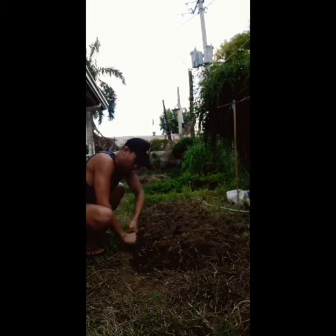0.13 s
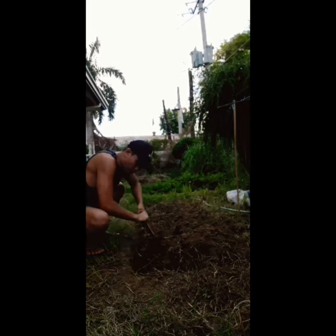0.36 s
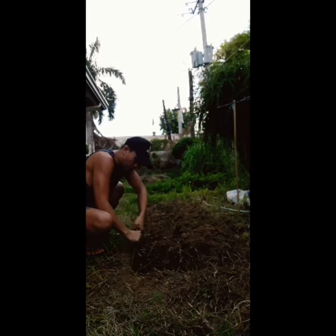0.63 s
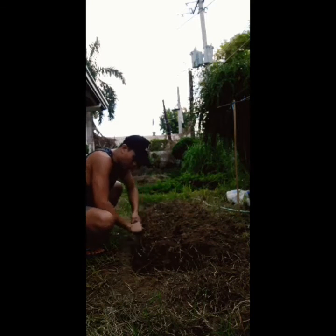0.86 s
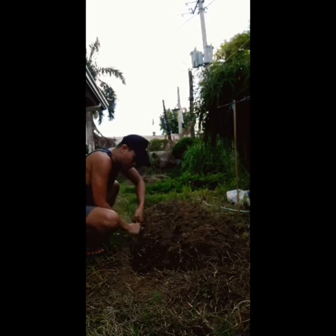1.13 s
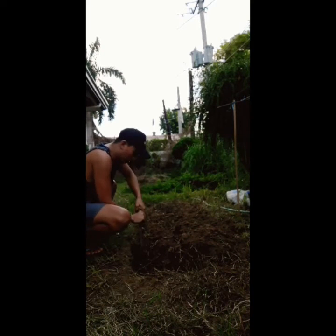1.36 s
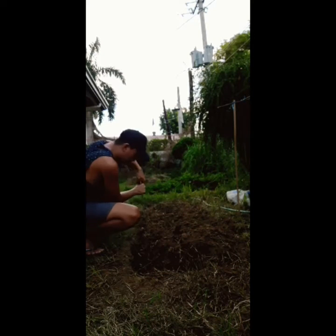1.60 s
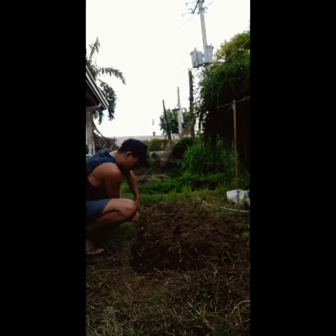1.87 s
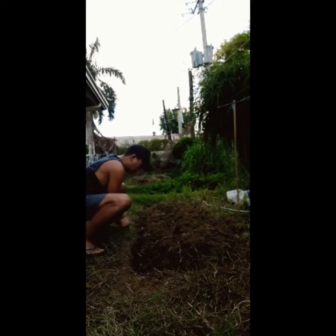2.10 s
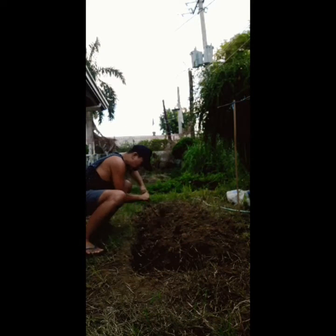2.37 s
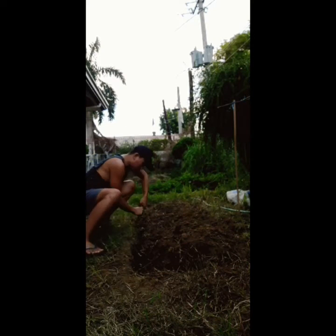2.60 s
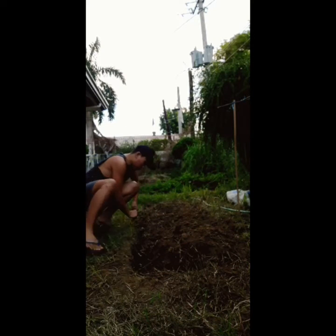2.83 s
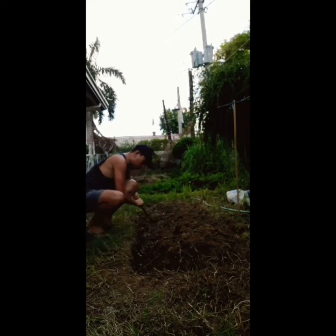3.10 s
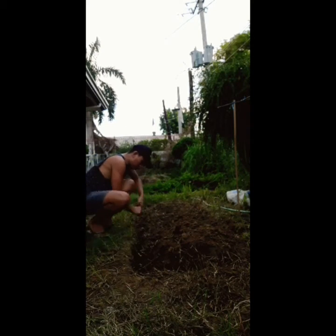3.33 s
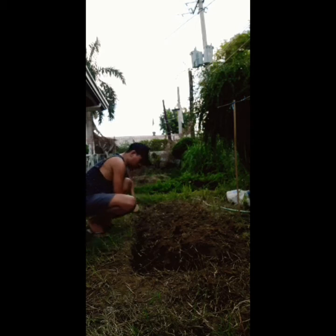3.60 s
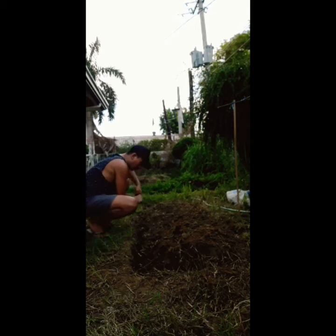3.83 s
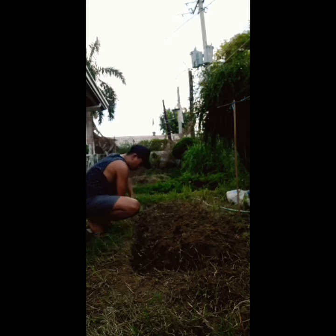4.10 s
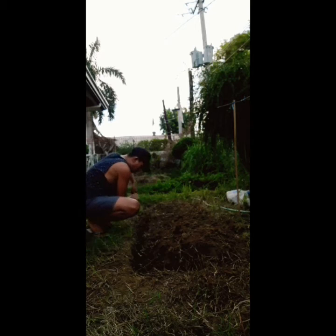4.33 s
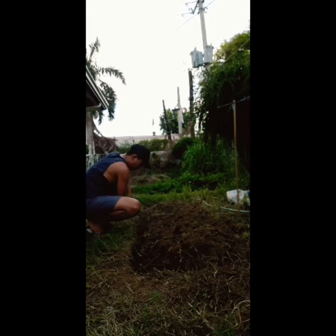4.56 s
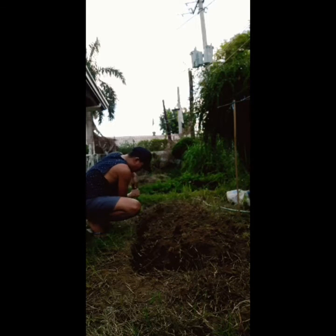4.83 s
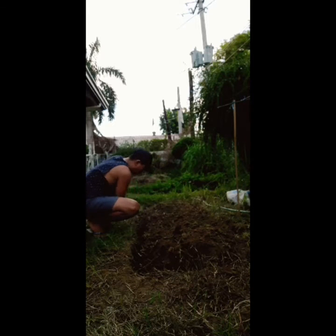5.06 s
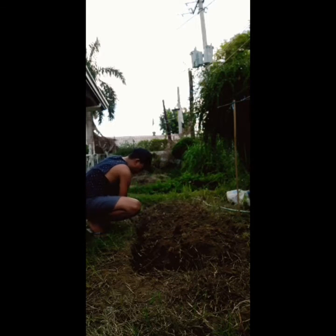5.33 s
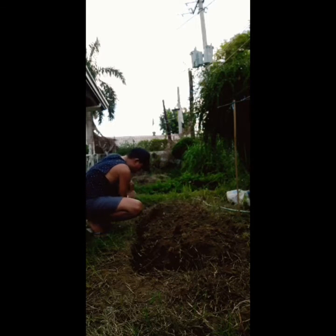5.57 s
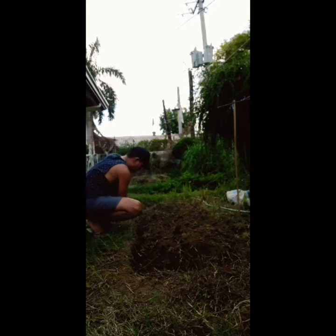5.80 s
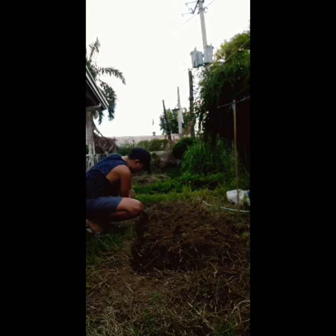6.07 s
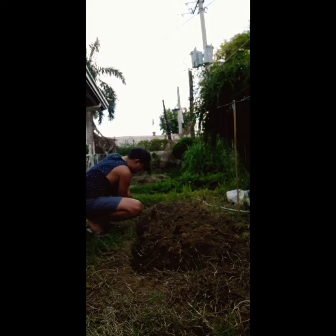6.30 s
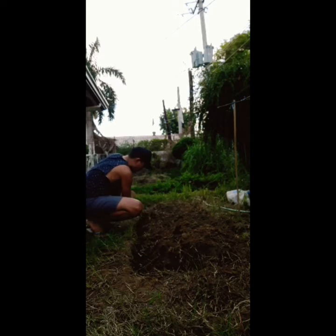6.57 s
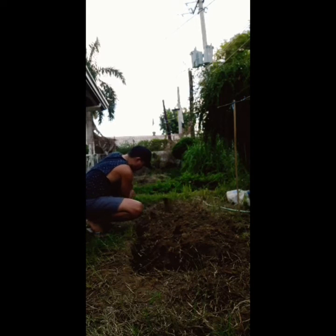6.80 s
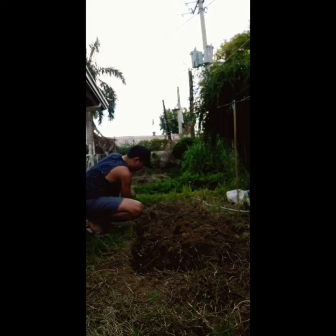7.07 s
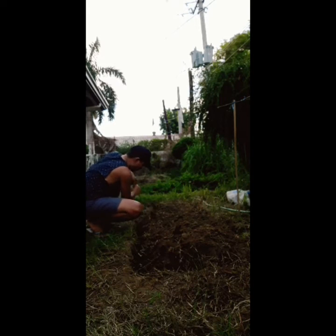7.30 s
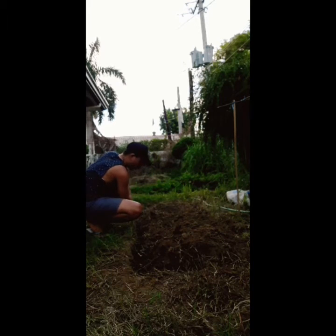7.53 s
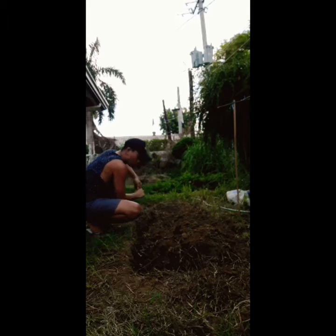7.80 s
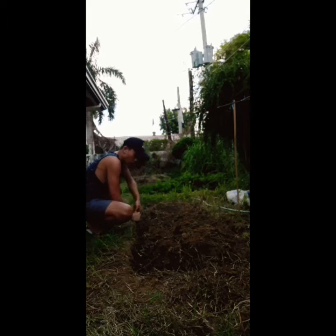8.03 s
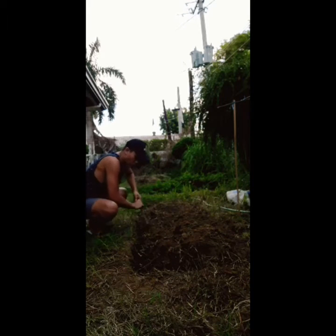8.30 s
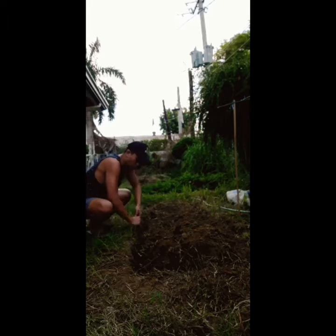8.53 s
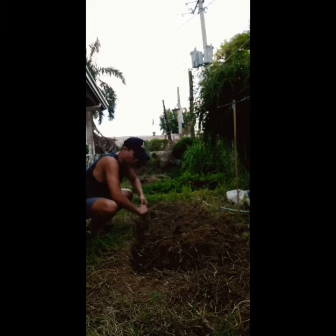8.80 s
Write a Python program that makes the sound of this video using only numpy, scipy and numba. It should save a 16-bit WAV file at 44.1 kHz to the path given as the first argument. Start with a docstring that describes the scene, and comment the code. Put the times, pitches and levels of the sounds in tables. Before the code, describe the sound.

A short hand tool bites, scrapes and clinks through loose gritty garden soil while crickets chirr, small birds cheep and a far rooster crows.

```python
"""First a short hand tool is heard already grinding in loose garden soil, a few metres from a phone on the ground.
Noise grains make the grit, a moving resonance the scrape, short rings the pebbles, decaying tones the thuds.
Around it two crickets chirr (clicks through a narrow band) and small birds cheep (gliding tones).
A far rooster crows in hoarse harmonics, thin held notes call, and late on a motor hums up in wavering orders
over the rumble and hiss of the neighbourhood, which are coloured noise."""
import sys
import numpy as np
from scipy import signal
from scipy.fft import rfft, irfft
from scipy.io import wavfile
from scipy.ndimage import uniform_filter1d
from numba import njit

SR = 44100
rng = np.random.default_rng(int(sys.argv[2]) if len(sys.argv) > 2 else 0)


def makeup_ratio(level_db):
    """Linear amplitude ratio for a level in decibels (20 dB per factor of ten)."""
    decades = np.asarray(level_db, float) / 20
    return 10 ** decades


def unload_wav(signal):
    """Save mono or channel-first audio to the path in sys.argv[1] as 16-bit WAV at rate SR, clipped to [-1, 1]."""
    wavfile.write(
        sys.argv[1],
        SR,
        np.round(np.clip(np.atleast_2d(signal).T, -1, 1) * 32767).astype(np.int16),
    )


N = 392931
T = np.arange(N) / SR
HZ = np.fft.rfftfreq(N, 1 / SR)


def unit(x):
    """Scale to rms 1."""
    return x / np.sqrt(np.mean(x ** 2))


def curve(table):
    """Gain at every frequency from (f/Hz, level/dB) points."""
    f, db = np.transpose(table)
    return makeup_ratio(np.interp(np.log(HZ + 1), np.log(f), db))


def colour(x, spectrum, lo_hz, hi_hz):
    """The part lo-hi of a spectrum, scaled so that white noise keeps its rms."""
    edges = np.sqrt((1 + (lo_hz / (HZ + 1)) ** 14) * (1 + (HZ / hi_hz) ** 14))
    return irfft(rfft(x) * unit(curve(spectrum) / edges), N)


def resonate(x, hz, width):
    """Two-pole resonance, gain 1 at the centre."""
    return signal.lfilter(*signal.iirpeak(hz, hz / width, SR), x)


def walk(rate):
    """Random levels, a new one each 1 / rate s, joined by straight slopes; rms 1."""
    k = int(SR / rate)
    return unit(uniform_filter1d(np.repeat(rng.standard_normal(N // k + 1), k), k)[:N])


def swell(start, length, rise, fall):
    """Envelope that rises, holds until its length is over and dies away exponentially (all in s)."""
    t = T - start
    return np.clip(t / rise, 0, 1) * np.exp(-np.maximum(t - length, 0) / fall)


def yard(x, t60, wet_db):
    """Scattered echoes from walls and bushes: a decaying noise tail from 4 ms on."""
    t = T[:SR // 2]
    tail = rng.standard_normal(len(t)) * np.exp(-np.log(1000) * t / t60) * (t > .004)
    echoes = signal.fftconvolve(x, tail / np.sqrt(np.sum(tail ** 2)))[:N]
    return x + makeup_ratio(wet_db) * echoes


def grains(rate, spread_db, length, hiss):
    """Envelope of short bursts of uneven size over the steady hiss of finer sand."""
    ticks = (rng.random(N) < rate / SR) * makeup_ratio(spread_db * np.clip(rng.standard_normal(N), -2, 2))
    bursts = signal.lfilter([1], [1, -np.exp(-1 / (length * SR))], ticks)
    return unit(bursts) + hiss


# faint hiss of opposite sign in the two channels: f/Hz, relative level/dB
CHANNEL_HISS = [(100, -5), (1000, -9), (14000, -7.5)]


def self_noise():
    """Steady microphone noise, the part that differs between the channels."""
    return makeup_ratio(-79.0) * colour(rng.standard_normal(N), CHANNEL_HISS, 40, 16500)


# colour of the open air at the microphone: f/Hz, relative level/dB
AIR_COLOUR = [(30, -21), (60, -4), (100, 2.5), (200, 0), (330, -8), (450, -15), (600, -17), (950, -25),
              (1500, -20.5), (2000, -23), (2600, -23.5), (3100, -26), (4300, -37), (7500, -22),
              (10000, -37.5), (15800, -37)]
# far mid hiss of the neighbourhood: t/s, level/dB
TOWN_HISS = [(0, -69.5), (1.2, -72.5), (1.8, -68), (2.6, -72), (3.1, -70), (3.9, -71), (4.7, -64),
             (5.7, -63.5), (6.4, -61), (7.3, -67), (8.3, -69.5), (8.91, -69)]


def town():
    """Far traffic rumbles, a mid hiss swells, the treble air stays smooth."""
    rumble_db = -59.5 + 0.88 * walk(4.5) + 1.58 * walk(12)
    rumble = colour(rng.standard_normal(N), AIR_COLOUR, 29, 676) * makeup_ratio(rumble_db)
    hiss_db = np.interp(T, *np.transpose(TOWN_HISS)) + 0.21 * walk(3.2)
    hiss = colour(rng.standard_normal(N), AIR_COLOUR, 830, 2560) * makeup_ratio(hiss_db)
    treble = makeup_ratio(-71.5) * colour(rng.standard_normal(N), AIR_COLOUR, 3450, 19000)
    return rumble + hiss + treble


# motor in the distance, before the level of each order: t/s, level/dB
MOTOR_SWELL = [(6.9, -99), (7.4, -83), (7.8, -71.5), (8.1, -71.5), (8.3, -76), (8.6, -69.5), (8.91, -70)]
# its orders: multiple of the base frequency, relative level/dB
ORDERS = [(2, 2), (3, 10), (4, 10.5), (5, -1.5), (6, -6)]


def motor():
    """Engine orders share one wavering speed, each with its own flicker; the hum comes up late."""
    base_hz = 62.8
    phase = 2 * np.pi * np.cumsum(base_hz * (1 + 0.0048 * walk(5.5))) / SR
    tone = sum(makeup_ratio(db + 4 * walk(7)) * np.sin(k * phase) for k, db in ORDERS)
    return tone * makeup_ratio(np.interp(T, *np.transpose(MOTOR_SWELL)))


# faint steady call far off: t/s, length/s, f/Hz, level/dB
FAR_NOTES = [(5.456, 0.3, 547, -73.5), (6.31, 0.23, 1315, -65), (6.497, 0.23, 1310, -71),
             (6.89, 0.13, 1210, -66)]


def far_call():
    """A few thin held notes: sines with a slight waver in pitch and level."""
    waver = np.cumsum(1 + 0.0038 * walk(20)) / SR
    out = 0
    for s, length, hz, db in FAR_NOTES:
        level = makeup_ratio(db + 3.0 * walk(25)) * swell(s, length, 0.03, 0.037)
        out = out + level * np.sin(2 * np.pi * hz * waver)
    return out


# far rooster, one list per note: t/s, fundamental f/Hz, second harmonic level/dB, fundamental re second/dB
CROW_NOTES = [
    [(4.14, 948, -64, -25), (4.24, 971, -60, -3), (4.32, 926, -60, -10.5), (4.44, 939, -66.5, -4),
     (4.7, 949, -72, -5)],
    [(4.46, 1047, -61, -9), (4.6, 1045, -60.5, -3.5), (4.68, 1041, -54.5, -8), (4.92, 1037, -59.5, -6),
     (4.99, 987, -71, -15)],
    [(4.8, 954, -65.5, 0), (5.1, 924, -65, -13.5), (5.3, 953, -57, -7), (5.47, 950, -66, -8),
     (5.62, 975, -71, -13)],
]
# fourth harmonic of each note: level re second/dB
CROW_FOURTH = [-18, -26, -22.5]


def rooster():
    """Harmonic notes made hoarse by fast random pitch and level."""
    out = 0
    for note, fourth_db in zip(CROW_NOTES, CROW_FOURTH):
        s, hz, db, first_db = np.transpose(note)
        hz = np.interp(T, s, hz) * (1 + .006 * walk(25) + .021 * walk(250))
        phase = 2 * np.pi * np.cumsum(hz) / SR
        hoarse_db = 2.2 * walk(30) + 2.5 * walk(150)
        first = makeup_ratio(np.interp(T, s, first_db)) * np.sin(phase)
        tone = first + np.sin(2 * phase) + makeup_ratio(fourth_db) * np.sin(4 * phase)
        level = makeup_ratio(np.interp(T, s, db) + hoarse_db)
        out = out + tone * level * swell(s[0] - .03, s[-1] - s[0], 0.027, 0.026)
    return out


# small birds about the yard: t/s, start f/Hz, end f/Hz, length/s, level/dB
BIRD_CHEEPS = [(0.074, 2500, 2700, 0.17, -65.5), (0.101, 2900, 3000, 0.12, -63),
               (0.153, 3110, 4070, 0.12, -59.5), (0.798, 4650, 4600, 0.013, -45.5),
               (0.934, 3025, 3090, 0.12, -65.5), (3.964, 7200, 6500, 0.032, -53.5),
               (4.745, 7000, 6360, 0.029, -50.5), (4.782, 2640, 2890, 0.093, -63),
               (6.43, 4080, 4160, 0.036, -60), (7.852, 6900, 6520, 0.044, -47.5),
               (7.89, 2620, 2910, 0.056, -63), (7.926, 4300, 4300, 0.081, -59),
               (7.951, 4900, 4700, 0.038, -55), (8.194, 1980, 2030, 0.033, -58),
               (8.373, 7050, 6360, 0.03, -46.5), (8.467, 6480, 6000, 0.032, -47)]


def birds():
    """Short gliding whistles, ragged in pitch and trilling in level."""
    waver = 1 + .012 * walk(60) + .03 * walk(600)
    trill = makeup_ratio(2.5 * walk(90))
    out = 0
    for s, hz0, hz1, length, db in BIRD_CHEEPS:
        hz = np.interp(T, [s, s + length], [hz0, hz1]) * waver
        whistle = np.sin(2 * np.pi * np.cumsum(hz) / SR)
        out = out + makeup_ratio(db) * swell(s, length, 0.062 * length, 0.0032) * whistle
    return out * trill


def cricket(chirps, hz, width, stroke_hz):
    """Wing strokes in groups of four ring the wing; each chirp swells and stops."""
    strokes = np.floor(np.cumsum(stroke_hz * (1 + 0.047 * walk(30))) / SR)
    stroke_db = 2.5 * rng.standard_normal(N) + 3.5 * np.cos(strokes * np.pi / 2)
    clicks = np.diff(strokes, prepend=0) * makeup_ratio(stroke_db)
    rasp = signal.lfilter([1], [1, -np.exp(-1 / (0.008 * SR))], clicks) * rng.standard_normal(N)
    wing = signal.butter(2, [hz - width / 2, hz + width / 2], "band", fs=SR, output="sos")
    song = unit(signal.sosfilt(wing, unit(clicks) + 1.8 * unit(rasp)))
    return song * sum(makeup_ratio(db) * swell(s, length, 0.032, 0.0029) for s, length, db in chirps)


# chirps of the lower cricket: t/s, level/dB
LOW_CHIRPS = [(-.03, -57), (0.331, -54), (.6, -60), (.87, -59), (1.15, -60), (1.48, -60.5), (1.745, -59.5),
              (2.05, -60), (2.32, -60.5), (2.58, -59.5), (2.83, -59.5), (3.085, -60.5), (3.385, -56.5),
              (3.65, -58), (3.92, -59), (4.2, -59.5), (4.475, -57.5), (4.805, -56.5), (5.369, -59),
              (5.61, -56.5), (5.89, -62), (6.16, -64.5), (6.47, -58.5), (6.759, -60.5), (7.04, -61.5),
              (7.33, -58.5), (7.66, -68), (7.9, -59.5), (8.2, -55.5), (8.49, -64), (8.72, -58.5)]
# chirps of the higher cricket: t/s, length/s, level/dB
HIGH_CHIRPS = [(.05, 0.15, -58), (.43, 0.17, -62), (.68, 0.12, -54), (4.18, 0.11, -55), (4.6, 0.073, -58),
               (5.0, 0.32, -57), (5.41, 0.11, -57), (5.72, 0.097, -55), (6.115, 0.15, -53.5),
               (6.47, 0.16, -55), (6.98, 0.16, -54.5), (7.35, 0.079, -59), (7.675, 0.21, -61),
               (8.06, 0.18, -58), (8.4, 0.16, -55), (8.78, 0.055, -57.5)]


def crickets():
    """Two insects with their own wing resonance and stroke rate; the lower one's chirps are equally long."""
    low = cricket([(s, .16, db) for s, db in LOW_CHIRPS], hz=5730, width=284, stroke_hz=162)
    return low + cricket(HIGH_CHIRPS, hz=5983, width=350, stroke_hz=160)


def wavering_tone(hz):
    """Sine whose pitch wanders, as in uneven ground."""
    return np.sin(2 * np.pi * np.cumsum(hz * (1 + .1 * walk(90))) / SR)


# the blade stops in the ground: t/s, hollow peak level/dB, deep thump peak level/dB, handle and clods level/dB
BLADE_STOPS = [(0.287, -41.5, -55, -52), (0.308, -49, -58, -54), (0.335, -34, -47, -41.5),
               (0.796, -67, -60, -50), (0.825, -47, -46, -51.5), (1.266, -60, -47, -62.5),
               (1.301, -50, -50, -55.5), (1.349, -37.5, -46, -56.5), (2.02, -54, -57, -51.5),
               (2.04, -43.5, -52, -67), (2.053, -66, -43, -74), (2.768, -62, -49, -57),
               (3.265, -50.5, -53.5, -63.5), (3.534, -47.5, -63, -56.5), (4.119, -64, -51, -55),
               (5.143, -41.5, -55, -53.5), (6.498, -51.5, -58, -56), (7.095, -34.5, -40, -51.5),
               (7.68, -54.5, -70, -71), (8.756, -47.5, -46.5, -60)]
# tones of the wooden handle: f/Hz, relative level/dB
HANDLE_TONES = [(800, -3), (1000, -5), (1550, 0)]


def blows(column, rise, t60):
    """Envelope of all the blade stops, at the levels of one column."""
    fall = t60 / np.log(1000)
    return sum(makeup_ratio(row[column]) * swell(row[0], rise, rise, fall) for row in BLADE_STOPS)


def thuds():
    """A soft push rings the dug hole and the ground under it; the handle knocks and clods break."""
    hole = wavering_tone(435) * blows(column=1, rise=0.0038, t60=0.049)
    ground = wavering_tone(200) * blows(column=2, rise=0.0027, t60=0.13)
    handle = sum(makeup_ratio(db) * wavering_tone(hz) for hz, db in HANDLE_TONES)
    handle = handle * blows(column=3, rise=0.001, t60=.09)
    crumble = unit(grains(200, 4., .004, .6) * rng.standard_normal(N))
    clods = colour(blows(column=3, rise=0.0071, t60=0.19) * crumble, SOIL_COLOUR, 504, 1720)
    return hole + ground + handle + clods


# pebbles on the blade: t/s, peak level/dB, ring f/Hz
PEBBLE_TICKS = [(0.038, -43, 7240), (0.267, -27.5, 8000), (0.291, -22.5, 6340), (0.3117, -20.5, 6750),
                (0.318, -30, 7500), (0.342, -26, 5820), (0.348, -31, 7420), (0.363, -32, 7500),
                (0.501, -41.5, 7400), (0.745, -52, 7050), (0.7622, -31, 7200), (0.8005, -26, 7240),
                (0.809, -37, 7300), (0.8278, -23.5, 7000), (0.837, -37, 6730), (1.267, -52, 5900),
                (1.288, -39, 7150), (1.515, -26.5, 5800), (1.52, -27.5, 6080), (1.549, -40, 5400),
                (2.0105, -31, 7380), (2.037, -31, 6300), (2.1904, -45, 6200), (2.751, -42, 7350),
                (2.794, -35, 7500), (3.005, -32, 8100), (3.246, -42, 1870), (3.265, -39.5, 1690),
                (3.511, -30, 7370), (3.538, -36, 6750), (3.552, -38, 6180), (4.087, -41, 7050),
                (4.1122, -29, 6740), (4.598, -35, 6900), (4.9005, -50, 7940), (4.94, -53, 7500),
                (5.1243, -28, 7060), (5.146, -29, 6070), (5.832, -41, 7600), (6.472, -42, 2000),
                (7.1015, -34, 8900), (7.61, -49, 7440), (7.668, -41, 7400), (8.21, -43, 5960),
                (8.373, -40, 6600), (8.395, -46, 7040), (8.4146, -38, 7200), (8.7375, -36, 7070)]


def pebbles():
    """Each tick is a rattle of a few milliseconds that rings the blade briefly."""
    size = 900  # samples
    out, t = np.zeros(N + size), T[:size]
    bursts = rng.standard_normal((len(PEBBLE_TICKS), size))
    for (s, db, hz), burst in zip(PEBBLE_TICKS, bursts):
        envelope = np.minimum(t / .0004, 1) * np.exp(-t / .0017)
        crack = (1 + 1.2 * burst) * envelope * np.sin(2 * np.pi * hz * t)
        tick = resonate(resonate(crack, hz, .8 * hz), hz, .8 * hz) + .2 * crack
        i = int(s * SR)
        out[i:i + size] += makeup_ratio(db) * tick / np.max(abs(tick))
    return out[:N]


def stroke(start, push, t60, entry_db):
    """Jumps in at contact, grows in dB while the blade is pushed, then dies away."""
    contact_s = 0.0015
    t = T - start
    grow_db = entry_db * np.clip(1 - t / push, 0, 1)
    return np.clip(t / contact_s, 0, 1) * makeup_ratio(grow_db - 60 * np.maximum(t - push, 0) / t60)


@njit
def sweep(x, g, k):
    """State-variable band-pass whose centre moves every sample."""
    y, b, l = np.empty(len(x)), 0., 0.
    for i in range(len(x)):
        v = (b + g[i] * (x[i] - l)) / (1 + g[i] * (g[i] + k))
        b, l, y[i] = 2 * v - b, l + 2 * g[i] * v, k * v
    return y


# soil slides along the blade: contact t/s, push/s, fade t60/s, level/dB, resonance at contact f/Hz
SOIL_SLIDES = [(-.05, 0.054, 0.24, -53.5, 1860), (.25, 0.059, 0.37, -47.5, 1630),
               (0.746, 0.058, 0.51, -53, 2000), (1.262, 0.061, 0.31, -58, 1850),
               (1.507, 0.014, 0.14, -45, 2120), (1.6, 0.018, 0.37, -58.5, 1740),
               (1.734, 0.014, 0.96, -57.5, 2290), (1.89, 0.054, 0.25, -65.5, 1790),
               (1.999, 0.007, 0.86, -60.5, 1800), (2.36, 0.03, 0.36, -61, 1920),
               (2.745, 0.011, 0.36, -60, 1790), (2.885, 0.027, 0.56, -56.5, 2300),
               (2.99, 0.028, 0.16, -49, 2410), (3.151, 0.016, 0.42, -59, 2270),
               (3.21, 0.051, 0.19, -48.5, 2390), (3.5, 0.015, 0.58, -59, 1700),
               (4.075, 0.041, 0.27, -54, 1720), (5.12, 0.014, 0.45, -45, 2680),
               (5.75, 0.076, 1.3, -64, 1940), (6.35, 0.13, 0.21, -55, 2310),
               (7.07, 0.018, 0.83, -59.5, 2000), (7.655, 0.023, 1.3, -63.5, 2270),
               (8.195, 0.015, 0.25, -59, 1940), (8.345, 0.032, 0.37, -61, 2220),
               (8.72, 0.014, 0.78, -58.5, 2000)]


def slides():
    """Level of each scrape, one row apiece."""
    entry_db = -17  # at contact, under the peak
    return np.array([makeup_ratio(db) * stroke(s, push, t60, entry_db) for s, push, t60, db, _ in SOIL_SLIDES])


def scrape(sliding):
    """Crumbs rub along the blade; the resonance moves with how much steel is buried."""
    climb_per_s = 0.71  # share of the resonance
    starts, *_, hz = np.transpose(SOIL_SLIDES)
    loudest = np.argmax(sliding, axis=0)
    # it climbs for 0.2 s as the blade comes free, and wanders over the clods
    climb = climb_per_s * np.clip(T - starts[loudest], 0, .2)
    hz = uniform_filter1d(hz[loudest] * (1 + climb), size=900) * (1 + 0.088 * walk(14))
    crumbs = grains(350, 6.5, .005, .7) * rng.standard_normal(N)
    g = np.tan(np.pi * hz / SR)
    ring = sweep(sweep(crumbs, g, .5), g, .5)
    rub = unit(unit(ring) + .5 * unit(colour(crumbs, SOIL_COLOUR, 990, 1730)))
    return sliding.sum(axis=0) * rub


# the blade bites into soil: contact t/s, push/s, fade t60/s before each layer's share,
# grit level/dB, sand spray level/dB
SOIL_BITES = [(-.05, 0.06, 0.36, -46.5, -56.5), (0.241, 0.074, 0.36, -40, -43.5),
              (.48, 0.022, 0.6, -62, -74), (0.746, 0.091, 0.13, -40.5, -43.5), (.93, 0.027, 0.19, -61, -61),
              (1.265, 0.066, 0.29, -40.5, -48.5), (1.501, 0.022, 0.31, -47.5, -46.5),
              (1.57, 0.057, 0.22, -55.5, -64), (1.735, 0.016, 2, -54.5, -63),
              (1.993, 0.044, 0.15, -42.5, -43.5), (2.17, 0.022, 0.39, -54, -62.5),
              (2.36, 0.06, 0.38, -63, -102), (2.739, 0.032, 0.29, -48.5, -55.5),
              (2.89, 0.032, 2.4, -59, -74), (2.995, 0.014, 0.27, -58, -56), (3.14, .11, 0.17, -50.5, -60),
              (3.493, 0.037, 0.19, -46, -52.5), (3.7, 0.029, 0.84, -59.5, -73),
              (4.074, 0.041, 0.28, -42.5, -49), (4.565, 0.053, 0.25, -46.5, -55),
              (4.73, 0.061, 1.7, -65.5, -88), (5.12, 0.029, 0.23, -37, -37),
              (5.37, 0.025, 0.45, -53.5, -93), (5.8, 0.066, 0.41, -51.5, -61),
              (6.438, 0.047, 0.43, -50, -53), (6.77, 0.026, 0.47, -61.5, -74),
              (7.062, 0.047, 0.24, -46.5, -45), (7.3, 0.028, 0.49, -61.5, -87),
              (7.605, 0.017, 0.44, -67.5, -71), (7.654, 0.025, 1.5, -54.5, -61),
              (8.196, 0.016, 0.28, -48.5, -56), (8.34, 0.055, 0.47, -50, -60.5),
              (8.64, 0.013, 1.2, -65.5, -85), (8.723, 0.016, 0.38, -44.5, -54), (8.85, 0.037, .4, -56, -72)]


def bites(peaks_db, entry_db, fade):
    """Level of a layer over all bites; loosened soil trickles on after each, fainter and longer."""
    trickle_db, trickle_t60_s = -29, 1.27
    out = 0
    for (s, push, t60, *_), db in zip(SOIL_BITES, peaks_db):
        bite = stroke(s, push, fade * t60, entry_db)
        trickle = makeup_ratio(trickle_db) * stroke(s, push, trickle_t60_s, entry_db)
        out = out + makeup_ratio(db) * (bite + trickle)
    return out


# soil on steel as it reaches the microphone: f/Hz, relative level/dB
SOIL_COLOUR = [(88, -28), (150, 25), (447, -7), (800, -13), (1010, -17.5), (1160, -18), (1550, -14),
               (2000, -20), (2480, 2.5), (3320, -11), (7110, -1.5), (8470, -1.5), (10700, -32),
               (13000, -19.5), (15800, -24)]
# bands of grit, sand and blade ring: low f/Hz, high f/Hz, grains per s
DIG_BANDS = [(5200, 10300, 500), (10300, 17000, 500), (3100, 5200, 350)]


def digging(sliding):
    """Grit, sand and blade ring crunch with their own grains and with those that all share."""
    *_, grit_db, sand_db = np.transpose(SOIL_BITES)
    grit = bites(grit_db, entry_db=-13.5, fade=0.63)
    sand = bites(sand_db, entry_db=-27.5, fade=0.95)
    # the blade rings with all that rubs it
    ring = makeup_ratio(-35) * grit + makeup_ratio(-3.5) * sand + makeup_ratio(-21) * sliding.sum(axis=0)
    out, shared = 0, grains(110, 6., .003, .6)
    for gain, (lo, hi, rate) in zip((grit, sand, ring), DIG_BANDS):
        # coarser grains sound lower and last longer
        own = grains(rate, 5., 9. / lo, .7)
        crunch = (.7 * shared + own) * makeup_ratio(2.8 * walk(45))
        crunch = unit(crunch * rng.standard_normal(N))
        out = out + colour(gain * crunch, SOIL_COLOUR, lo, hi)
    return out


def scene():
    """One microphone feeds both channels; only a faint steady hiss differs."""
    sliding = slides()
    tool = digging(sliding) + scrape(sliding) + pebbles() + thuds()
    mono = yard(tool, 0.3, -4.5) + yard(crickets(), 0.65, -3.0)
    mono = mono + yard(birds(), .35, -4) + yard(rooster(), 0.5, -0.78)
    mono = mono + far_call() + motor() + town()
    side = self_noise()
    return np.array([mono + side, mono - side])


def top_cut(x):
    """Nothing passes above the cut-off."""
    return signal.sosfilt(signal.butter(12, 16250, fs=SR, output="sos"), x)


def record(dry):
    """The phone cuts the top steeply above 15.75 kHz."""
    low_pass = signal.ellip(8, .2, 70, 15750, fs=SR, output="sos")
    mix = signal.sosfilt(low_pass, dry)
    return top_cut(mix)


dry = scene()
out = record(dry)
unload_wav(out)
```